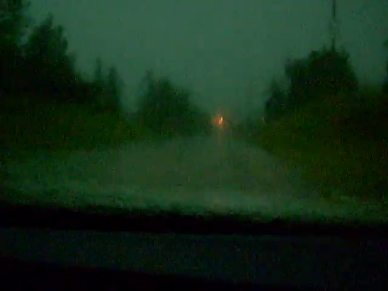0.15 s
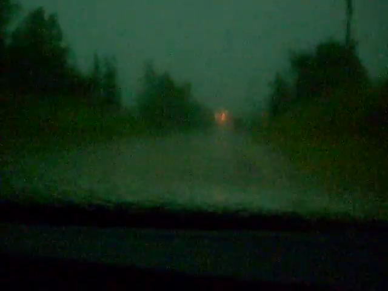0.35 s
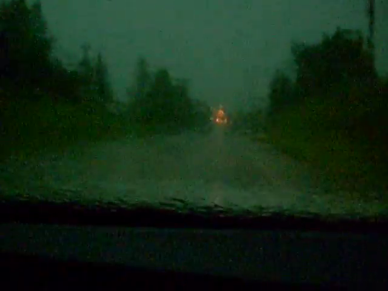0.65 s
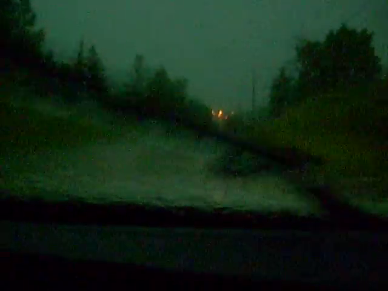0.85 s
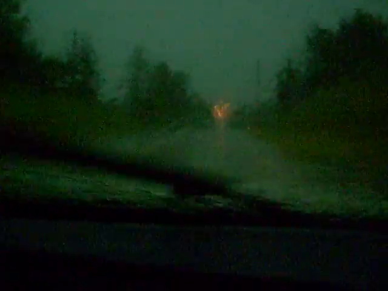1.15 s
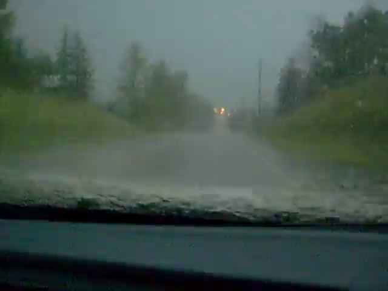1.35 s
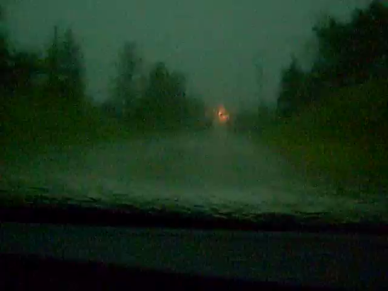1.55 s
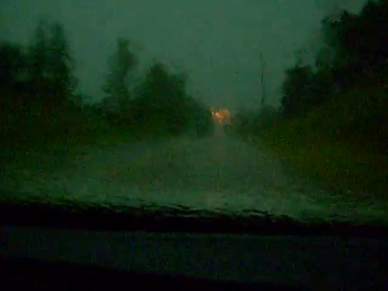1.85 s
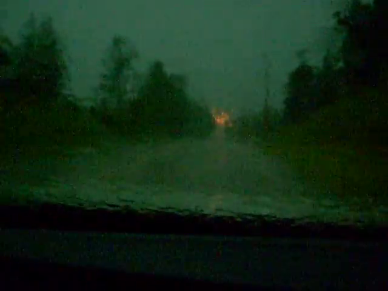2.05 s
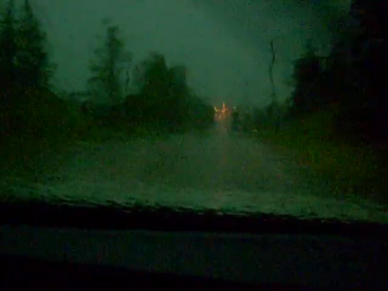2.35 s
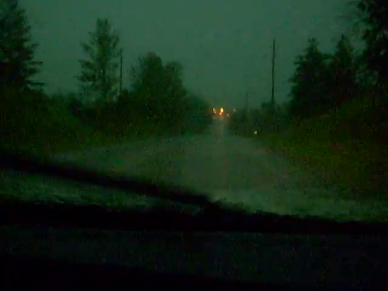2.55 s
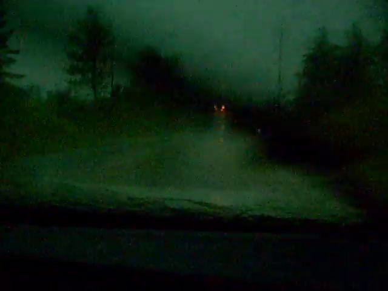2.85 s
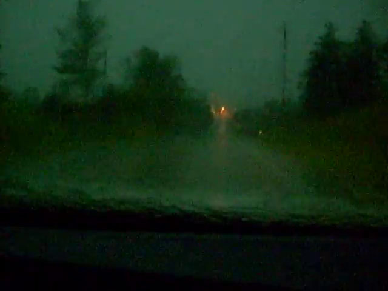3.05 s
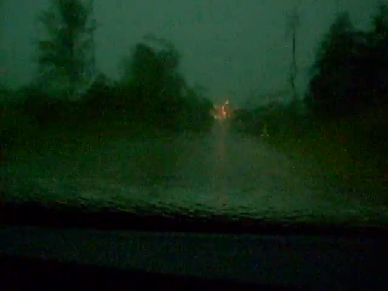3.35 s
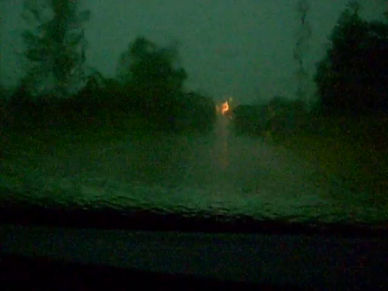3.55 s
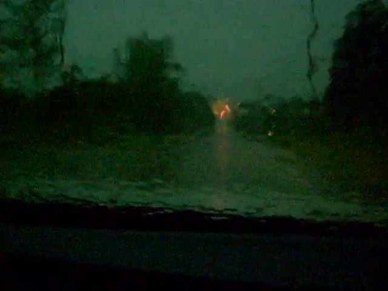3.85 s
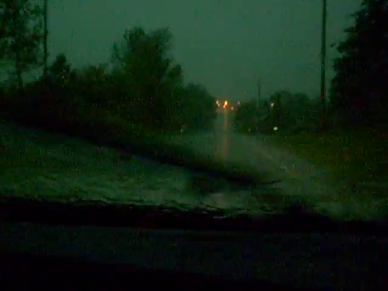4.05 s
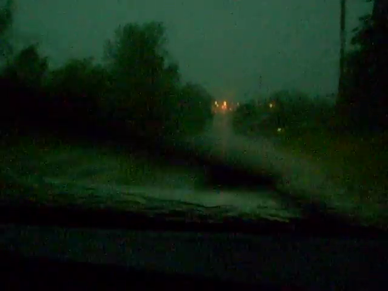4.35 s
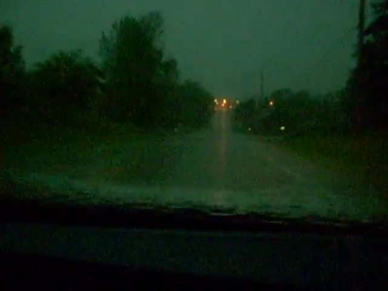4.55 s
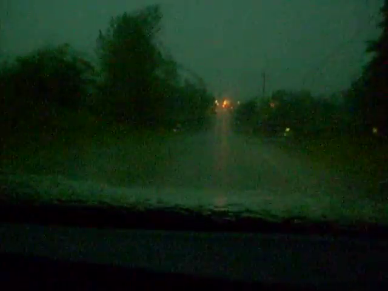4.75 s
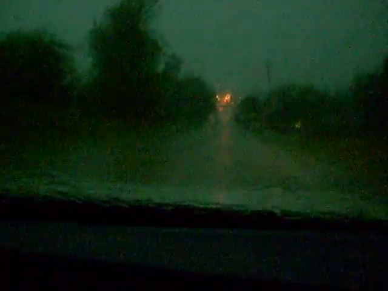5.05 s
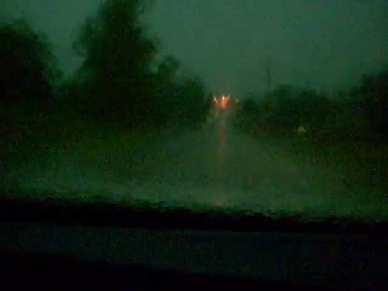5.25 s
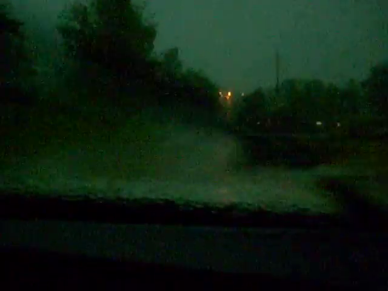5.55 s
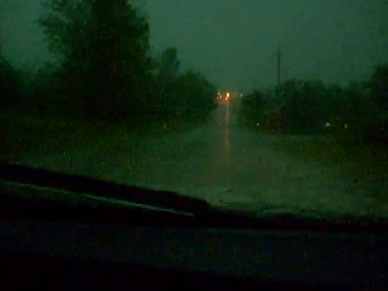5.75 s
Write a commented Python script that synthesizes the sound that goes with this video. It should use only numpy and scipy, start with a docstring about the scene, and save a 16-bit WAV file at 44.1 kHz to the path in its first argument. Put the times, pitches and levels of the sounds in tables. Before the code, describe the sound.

Heavy rain patters on a moving car's windshield, heard from inside, over soft wiper thuds, engine hum and wet tyre noise.

```python
"""Heavy rain on a moving car, heard behind the windshield through a small microphone ringing near 3.2 kHz.
From the start, thousands of drops a second hit the glass in gusts, over engine hum, tyres and spray.
A rough patch and two bumps shake the body; fat drops slap from 0.5 s. From 1.2 s the wipers thud
about every 1.6 s; the rubber catches once, near 2.6 s. At 3.5 s the engine shifts up, then slowly
loses speed, while more bumps and two short rough patches pass."""
import sys
import numpy as np
from scipy import signal
from scipy.fft import rfft, irfft, next_fast_len
from scipy.io import wavfile
from scipy.ndimage import uniform_filter1d

SR = 44100
rng = np.random.default_rng(int(sys.argv[2]) if len(sys.argv) > 2 else 0)


def dump(signal):
    """Clip the signal to [-1, 1] and save it as 16-bit WAV at the path in sys.argv[1]."""
    limited = np.clip(np.atleast_2d(signal).T, -1, 1)
    pcm = np.round(limited * 32767).astype(np.int16)
    wavfile.write(sys.argv[1], SR, pcm)


N = 259744
TIME_S = np.arange(N) / SR
FFT_SIZE = next_fast_len(N + 8192, True)

# rain strength, gusts and lulls: t/s, relative level/dB
GUSTS = [(0, -25.5), (0.47, -24), (0.73, -27), (0.99, -24.5), (1.21, -29), (1.36, -24), (2.33, -29.5),
         (2.4, -26.5), (2.48, -31.5), (2.75, -27), (2.83, -30), (2.98, -24.5), (3.12, -27), (3.31, -23),
         (3.35, -25.5), (3.73, -26), (3.83, -30), (4.7, -27), (5.08, -32.5), (5.28, -23), (5.66, -31),
         (5.88, -27)]
# spectrum of one impact, heard in the cabin: f/Hz, gain/dB
GLASS_EQ = [(120, -5), (300, 0), (600, -1.5), (1100, 0.5), (1650, -3), (1880, 0.5), (2150, -3), (2600, -1),
            (3200, -2.5), (4100, -1.5), (4500, -3.5), (6000, -7.5), (8500, -15), (10500, -16)]
# treble of the drops: t/s, gain/dB
TREBLE_GAIN = [(0, 1), (1.2, 1.5), (1.6, 0), (2.2, 1), (2.47, -2), (2.95, 4), (3.6, -3.5), (5.89, 0)]
# single hard ticks: t/s, relative level/dB
HARD_TICKS = [(0.347, -33), (2.2398, -38), (4.4796, -35), (5.248, -28), (5.604, -37.5)]
# engine partials: multiple of firing rate, relative level/dB
ENGINE_PARTIALS = [(.5, -13.5), (1, 0), (1.5, -6), (2, -1.5), (3, -4)]
# rough road: start t/s, length/s, relative level/dB
ROUGH_PATCHES = [(.06, .62, -41.5), (4.817, .18, -43), (5.824, .2, -48)]
# body rumble spectrum: f/Hz, gain/dB
RUMBLE_EQ = [(12, -7.5), (25, 0), (42, 7.5), (62, 5.5), (85, -3), (130, -40.5)]
# tyres on wet road: f/Hz, gain/dB
TYRE_EQ = [(50, -26), (85, -2.5), (120, -0.5), (160, -4), (235, 1), (280, -4), (320, -10), (500, -5),
           (1000, -10.5), (3000, -33.5)]
# road water, heard through the doors: f/Hz, gain/dB
SPRAY_EQ = [(150, -21.5), (380, 5.5), (600, -5), (1200, -1), (1650, -6), (1950, -5), (2600, -8.5),
            (4000, -21), (9000, -37)]
# road bumps: t/s, level/dB, f/Hz, decay/s
ROAD_BUMPS = [(.16, -38.5, 364, 0.019), (.38, -37, 258, 0.024), (3.72, -38.5, 260, .03),
              (4.755, -38, 111, .035), (4.93, -40, 65.5, .06), (5.85, -37, 73, 0.051)]
# fat drops: t/s, relative level/dB
FAT_DROP_HITS = [(0.4868, -9), (1.0291, -8), (1.4132, -10), (1.5369, -10), (1.7599, -11), (1.9819, -14),
                 (2.4578, -16), (2.6943, -13), (3.1762, -13), (3.6501, -10), (3.8716, -19), (3.9943, -16),
                 (4.0801, -16), (4.5037, -14), (4.8294, -17), (4.9417, -15), (5.025, -21), (5.0928, -17),
                 (5.1841, -14), (5.2699, -10), (5.4036, -11), (5.4924, -16), (5.5438, -12), (5.5677, -16),
                 (5.6042, -16)]
# blades landing at the foot of the glass: t/s, level/dB
WIPER_LANDINGS = [(1.17, -34.5), (2.735, -36.5), (4.305, -36), (5.856, -37)]
# one landing (arm knock, rubber swish and flop, linkage thud): delay/s, relative level/dB, f/Hz, decay/s
LANDING_KNOCKS = [(-.135, -1.5, 190, 0.03), (-.015, -5, 885, 0.028), (-.015, -5.5, 438, 0.043),
                  (0, -2.5, 224, 0.08), (.02, -2, 114, 0.046)]
# rubber catching on the glass: t/s, level/dB, f/Hz, decay/s
WIPER_RUBS = [(2.555, -43, 1840, 0.027)]


def undb(db):
    """Decibels to gain."""
    return 10 ** (np.asarray(db) / 20)


def unit(x):
    """Scale to rms 1."""
    return x / np.sqrt(np.mean(x ** 2))


def curve(table):
    """Linear interpolation of (t/s, value) rows."""
    return np.interp(TIME_S, *np.transpose(table))


def colour(x, eq):
    """Minimum-phase filter through (f/Hz, gain/dB) rows; attacks stay sharp."""
    hz, db = np.transpose(eq)
    bins_hz = np.maximum(np.fft.rfftfreq(FFT_SIZE, 1 / SR), 1)
    gain = undb(np.interp(np.log(bins_hz), np.log(hz), db))
    cepstrum = irfft(np.log(gain), FFT_SIZE)
    cepstrum[1:FFT_SIZE // 2] *= 2
    cepstrum[FFT_SIZE // 2:] = 0
    return irfft(rfft(x, FFT_SIZE) * np.exp(rfft(cepstrum)), FFT_SIZE)[:N]


def noise(eq):
    """Coloured noise, rms 1."""
    return unit(colour(rng.standard_normal(N), eq))


def ring(x, hz, width_hz):
    """One resonance, gain 1 at centre."""
    return signal.lfilter(*signal.iirpeak(hz, hz / width_hz, fs=SR), x)


def wander(rate_hz):
    """Smooth random drift, rms 1."""
    hold = int(SR / rate_hz)
    steps = np.repeat(rng.standard_normal(N // hold + 1), hold)
    return unit(uniform_filter1d(steps, hold)[:N])


def rain_level_db(flurry_db=0.3, shield_db=-2, lead_s=0.29, sigma_s=0.06):
    """Gusts, small flurries and a lull as each falling blade shields the glass."""
    shielded = sum(np.exp(-0.5 * ((TIME_S - s + lead_s) / sigma_s) ** 2) for s, _ in WIPER_LANDINGS)
    return curve(GUSTS) + flurry_db * wander(22) + shield_db * shielded


def glass_impact(bending_s, bending_db, cabin_s, cabin_db):
    """One spot on the glass: a click, spread-out bending waves, echoes of the padded cabin."""
    age_s = TIME_S[:2048]
    response = signal.unit_impulse(len(age_s))
    for decay_s, db in (bending_s, bending_db), (cabin_s, cabin_db):
        tail = rng.standard_normal(len(age_s)) * np.exp(-age_s / decay_s)
        response += undb(db) * tail / np.linalg.norm(tail)
    return response / np.linalg.norm(response)


def patter(rain_db, drops_per_s=2200, spread_db=4.5, crowding=1.2, spots=40, gain_db=-10):
    """Drops of many sizes on many spots; gusts bring more and heavier ones."""
    density = undb(crowding * (rain_db - rain_db.mean()))
    out = np.zeros(N)
    for _ in range(spots):
        hits = rng.random(N) < drops_per_s * density / (spots * SR)
        sizes = undb(spread_db * np.minimum(rng.standard_normal(N), 2.16))
        impact = glass_impact(bending_s=0.0009, bending_db=1, cabin_s=0.0069, cabin_db=-3)
        out += signal.oaconvolve(hits * sizes, impact * rng.choice([-1, 1]))[:N]
    return unit(colour(out / np.sqrt(density), GLASS_EQ)) * undb(rain_db + gain_db)


def treble_flicker(drops, edge_hz=4500, flicker_db=1.7):
    """The treble swells and fades; no two handfuls of drops hit alike."""
    treble = signal.sosfiltfilt(signal.butter(2, edge_hz, "high", fs=SR, output="sos"), drops)
    gain = undb(curve(TREBLE_GAIN) + flicker_db * wander(90))
    return drops + (gain - 1) * treble


def ticks(rain_db, ticks_per_s=130, faint_db=-26, spread_db=6.5, gain_db=34):
    """Bright sub-millisecond clicks: many faint, a few loud."""
    sizes = undb(rain_db + faint_db + spread_db * np.minimum(rng.standard_normal(N), 2))
    clicks = (rng.random(N) < ticks_per_s / SR) * sizes
    for s, db in HARD_TICKS:
        clicks[int(s * SR)] += undb(db)
    bright_eq = [(1000, -25.5), (3500, -16.5), (6500, -3.5), (9500, -4), (12000, -11.5)]
    return undb(gain_db) * colour(clicks, bright_eq)


def engine(shift_at_s=3.5, shift_s=0.6, dip_db=-2, sag_hz_per_s=4, waver=0.004, flutter_db=0.5):
    """Firing hum through the bulkhead: cruise, upshift with the load briefly off, slow sag."""
    shift = np.clip((TIME_S - shift_at_s) / shift_s, 0, 1)
    coasting_s = np.maximum(TIME_S - shift_at_s - shift_s, 0)
    firing_hz = np.interp(shift, [0, 1], [93.8, 73.5]) - sag_hz_per_s * coasting_s
    level_db = np.interp(shift, [0, 1], [-50.5, -54.5]) + dip_db * np.sin(np.pi * shift)
    phase = 2 * np.pi * np.cumsum(firing_hz * (1 + waver * wander(9))) / SR
    return np.sqrt(2) * sum(undb(level_db + db + flutter_db * wander(11)) * np.sin(multiple * phase)
                            for multiple, db in ENGINE_PARTIALS)


def roughness(smooth_db=-51.5, attack_s=0.04, release_s=0.13):
    """Body shake envelope: low on smooth road, builds on each rough patch, then dies away."""
    power = undb(smooth_db) ** 2
    for start_s, length_s, db in ROUGH_PATCHES:
        attack = np.clip((TIME_S - start_s) / attack_s, 0, 1)
        release = np.exp(-np.maximum(TIME_S - start_s - length_s, 0) / release_s)
        power += (undb(db) * attack * release) ** 2
    return np.sqrt(power)


def road(rumble_gain_db=-1, tyres_db=-43, boom_db=-50):
    """Body rumble, steady tyre roar and boom of the cabin air."""
    rumble = noise(RUMBLE_EQ) * undb(rumble_gain_db) * roughness()
    tyres = noise(TYRE_EQ) * undb(tyres_db)
    boom = unit(ring(rng.standard_normal(N), hz=277.4, width_hz=16)) * undb(boom_db)
    return rumble + tyres + boom


def spray(level_db=-50, wander_db=4.5):
    """Water thrown up by the wheels: dull hiss, heard when the rain eases."""
    return noise(SPRAY_EQ) * undb(level_db + wander_db * wander(14))


def thuds(blows, rise_s, relative_width):
    """Soft blows, each shaking a part around one pitch and dying away."""
    out = np.zeros(2 * N)
    age_s = TIME_S[:SR // 2]
    for s, db, hz, decay_s in blows:
        envelope = (1 - np.exp(-age_s / rise_s)) * np.exp(-age_s / decay_s)
        width_hz = relative_width * hz
        shake = ring(ring(rng.standard_normal(SR), hz, width_hz), hz, width_hz)[-len(age_s):]
        start = int(s * SR)
        out[start:start + len(age_s)] += unit(shake * envelope) / unit(envelope).max() * undb(db)
    return out[:N]


def bumps():
    """Road bumps thud through the body."""
    return thuds(ROAD_BUMPS, rise_s=0.017, relative_width=0.7)


def fat_drops(gain_db=16.5):
    """Heavy drops close by: little bass on the stiff glass, top softened by the longer push."""
    out = np.zeros(2 * N)
    for s, db in FAT_DROP_HITS:
        impact = glass_impact(bending_s=0.0013, bending_db=-5, cabin_s=0.0037, cabin_db=-9)
        start = int(s * SR)
        out[start:start + len(impact)] += undb(db + gain_db) * impact
    slap_eq = [(600, -11), (2000, -7), (3200, -4.5), (6000, -8), (10000, -12)]
    return colour(colour(out[:N], GLASS_EQ), slap_eq)


def wipers():
    """Each stroke ends in a few soft knocks; the rubber catches once on the way down."""
    blows = [(s + delay_s, db + relative_db, hz, decay_s)
             for s, db in WIPER_LANDINGS for delay_s, relative_db, hz, decay_s in LANDING_KNOCKS]
    knocks = thuds(blows, rise_s=0.016, relative_width=0.96)
    rub = thuds(WIPER_RUBS, rise_s=0.026, relative_width=0.13)
    return knocks + rub


def scene():
    """Rain on the glass over engine, road and wipers; mono."""
    rain_db = rain_level_db()
    rain = treble_flicker(patter(rain_db) + fat_drops()) + ticks(rain_db)
    car = engine() + road() + spray() + wipers() + bumps()
    return (rain + car)[None]


def record(dry, port_hz=3217, width_hz=231, cutoff_hz=11000):
    """Microphone port: a small cavity rings at one pitch and dulls the top; then a steep low-pass."""
    hz = np.fft.rfftfreq(FFT_SIZE, 1 / SR)
    port = 1 / (1 - (hz / port_hz) ** 2 + 1j * hz * width_hz / port_hz ** 2)
    heard = irfft(rfft(dry, FFT_SIZE) * port, FFT_SIZE)[:, :N]
    return signal.sosfilt(signal.butter(18, cutoff_hz, fs=SR, output="sos"), heard)


dry = scene()
out = record(dry)
dump(out)
```